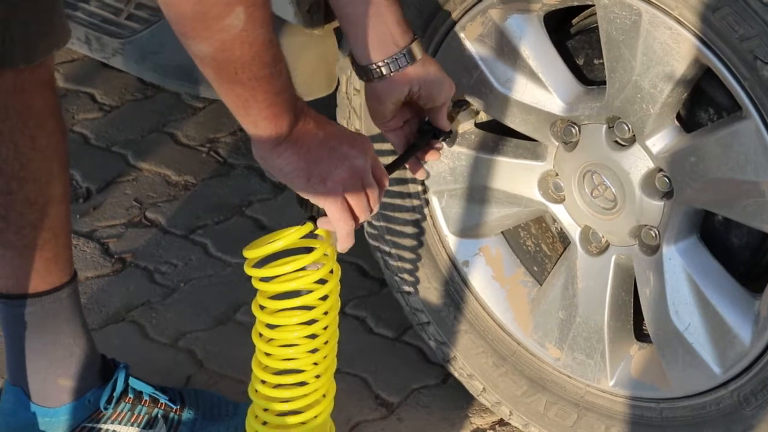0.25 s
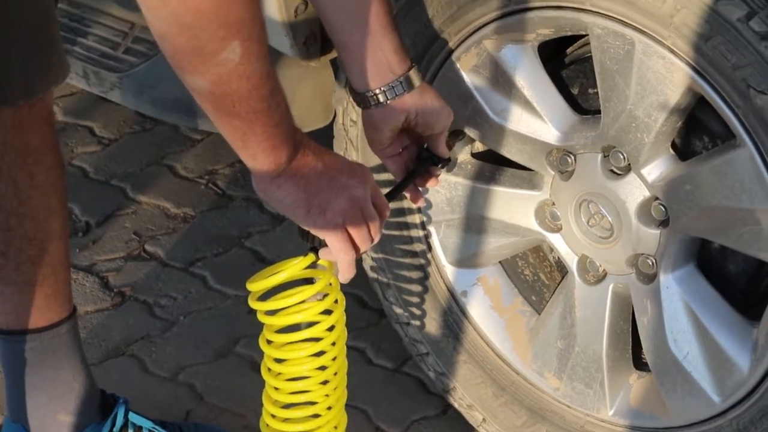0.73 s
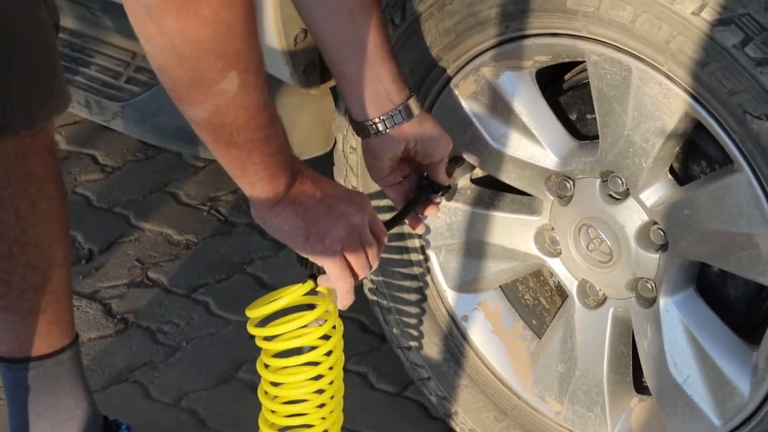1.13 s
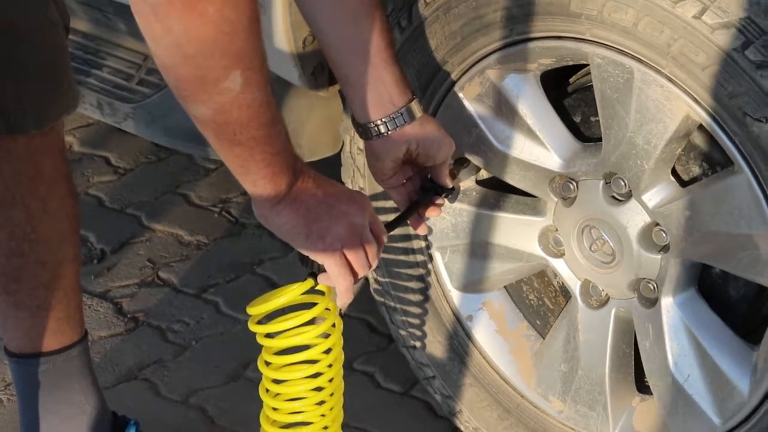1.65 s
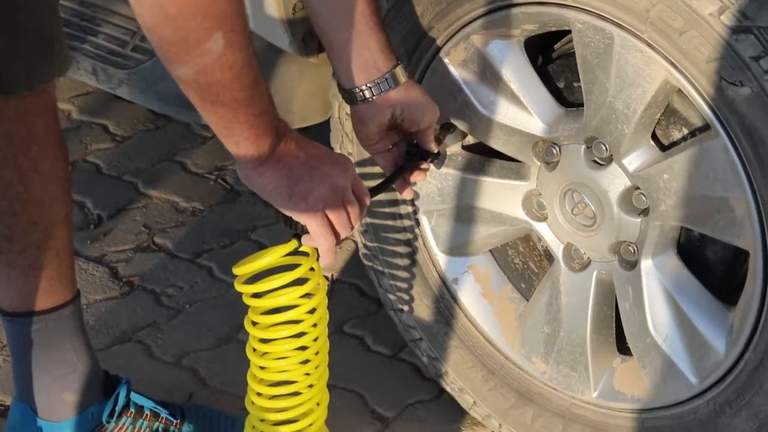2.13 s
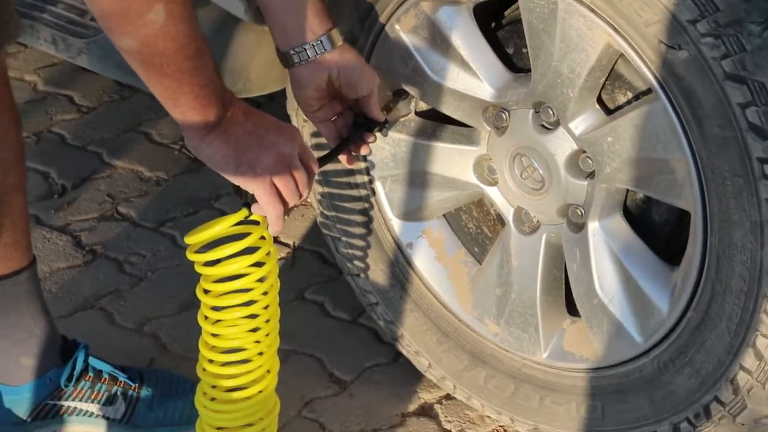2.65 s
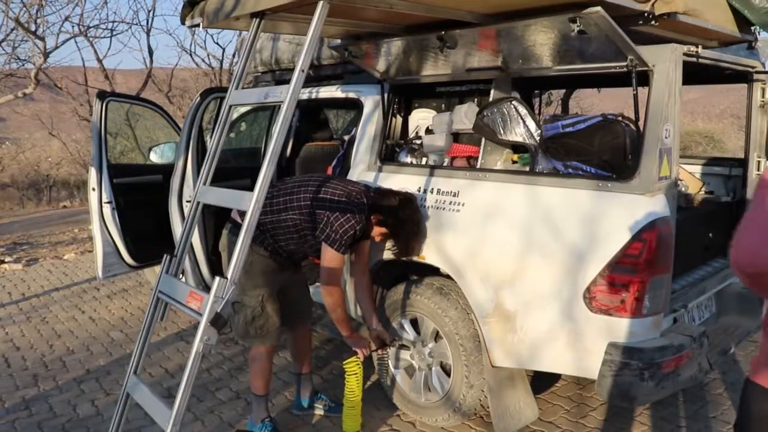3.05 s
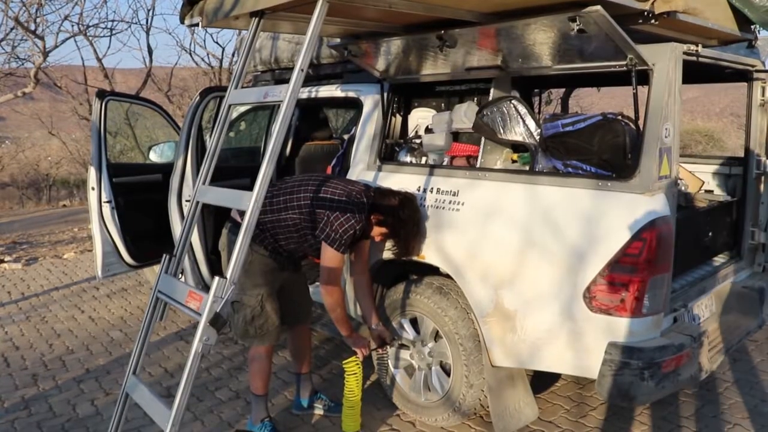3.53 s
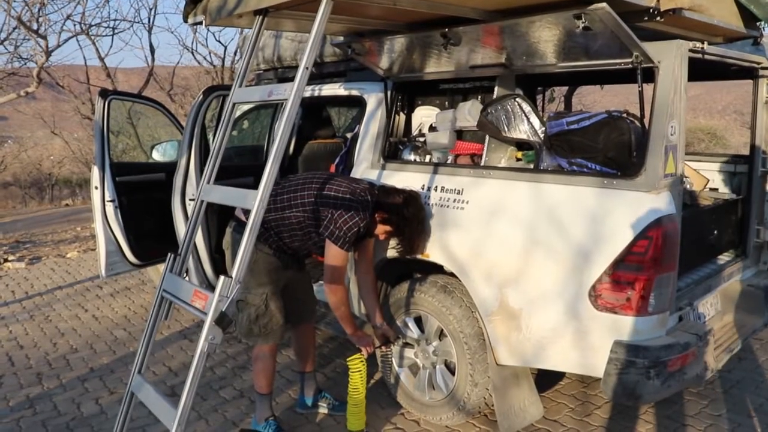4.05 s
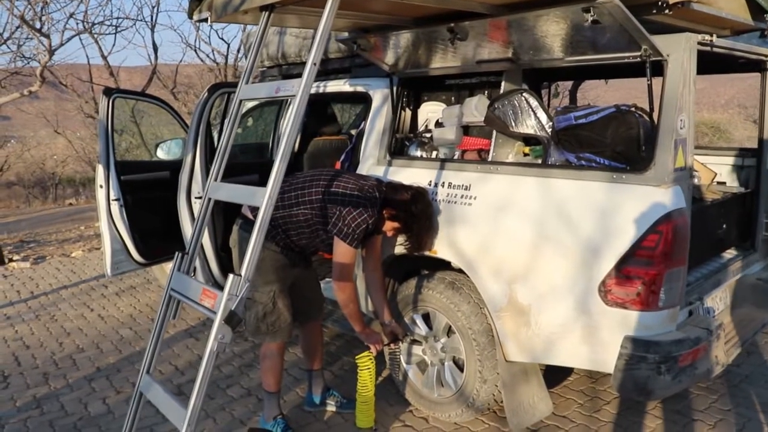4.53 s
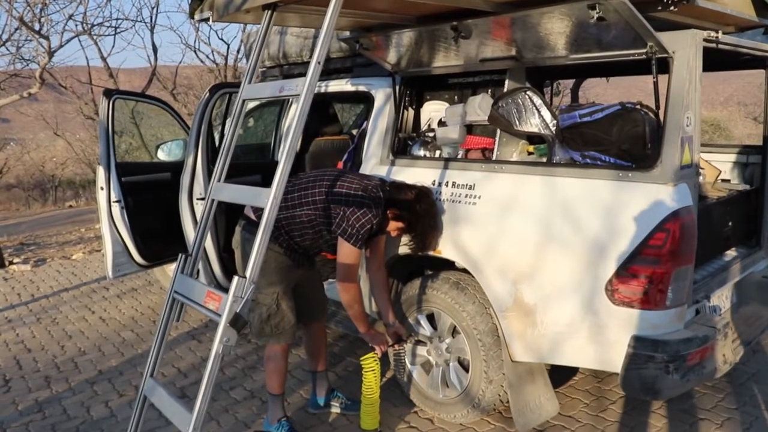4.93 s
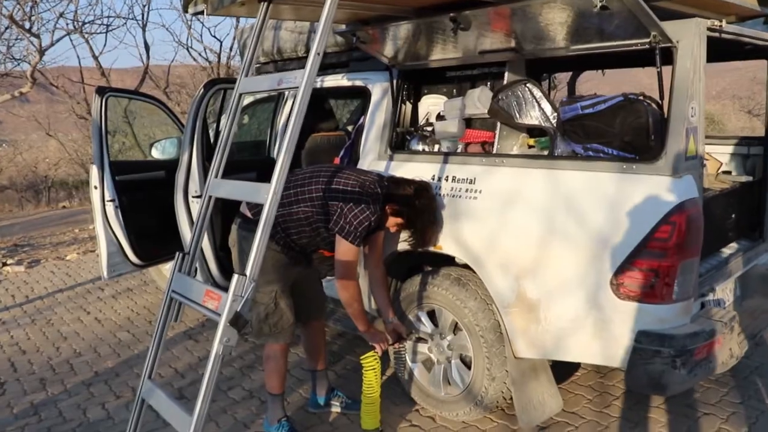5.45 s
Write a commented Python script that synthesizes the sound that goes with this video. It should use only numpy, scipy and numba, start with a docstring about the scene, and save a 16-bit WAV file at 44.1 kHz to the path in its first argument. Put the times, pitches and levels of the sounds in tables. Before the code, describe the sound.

Two long, loud hisses of compressed air from a tyre valve, with handling knocks between them and a metallic rattle at the end, outdoors.

```python
"""Two hissing bursts of air are heard outdoors, with knocks, scuffs and a metallic rattle over a low rumble.
Air is let out of a pickup tyre on paving through a hand-held gauge: the jet is noise coloured by the
gauge head, the hand and the wheel rim, differently for each grip. Knocks and scuffs are shaped noise;
the rattle adds wavering tones. One mono microphone signal, with gain control, fills both channels."""
import sys
import numpy as np
from scipy import signal
from scipy.fft import rfft, irfft, next_fast_len
from scipy.io import wavfile
from scipy.ndimage import uniform_filter1d
from numba import njit

SR = 44100
rng = np.random.default_rng(int(sys.argv[2]) if len(sys.argv) > 2 else 0)


def transcribe(u):
    """Save the signal u as a 16-bit wav file named by the first command-line argument.

    u: samples, shape (n,) or (channels, n), limited to [-1, 1]; the rate is SR.
    q: integer samples, one column per channel.
    """
    v = np.clip(np.atleast_2d(u).T, -1, 1)
    q = np.round(v * 32767).astype(np.int16)
    wavfile.write(sys.argv[1], SR, q)


N = 251060
SIZE = next_fast_len(N, True)  # a length that suits the Fourier transform
TIME = np.arange(N) / SR  # s
FREQ = np.maximum(np.fft.rfftfreq(SIZE, 1 / SR), 1)  # Hz

# the valve is pressed open twice:
# [opens t/s, attack t/s, closes t/s, base level/dB, extra body/dB, opening chuff/dB]
BURSTS = [(0.201, 0.036, 2.202, -16, -1.28, 6.5), (3.608, 0.024, 5.15, -17.5, 1.3, 3)]
# peaks and dips of the pocket between gauge, hand and rim, for each grip: [centre f/Hz, width f/Hz, level/dB]
FIRST_GRIP = [(640, 60, -4.4), (820, 70, -3.0), (1010, 280, 3.8), (1120, 90, -3.8), (1370, 70, 7.1),
              (1510, 40, -3.2), (2000, 220, -4.6), (2550, 310, -3.1), (2700, 80, 3.8), (3160, 80, -4.7),
              (3580, 60, -3.0), (4120, 70, -2.8), (4440, 300, 3.5), (4850, 190, -4.2), (5380, 280, -5.7),
              (5750, 150, 2.3), (6180, 130, -4.2), (6760, 590, 1.3), (7650, 300, 1.2), (10060, 180, 2.4),
              (11390, 560, -2.1), (12580, 300, 3.3), (13430, 400, -3.2), (14020, 250, -2.4)]
SECOND_GRIP = [(820, 70, -5.9), (1050, 40, -3.8), (1150, 640, 7.3), (1370, 60, -5.4), (1540, 80, -7.0),
               (1870, 70, -6.0), (1900, 240, 5.6), (2400, 70, 3.4), (2490, 50, -4.0), (2830, 80, -3.5),
               (3720, 80, -6.8), (4090, 540, 3.6), (4280, 70, 4.3), (4500, 90, -4.5), (5440, 50, 4.8),
               (6440, 190, -4.2), (7490, 270, -6.4), (7890, 590, 1.7), (8580, 160, -4.6), (9170, 230, 5.3),
               (10520, 670, -2.2), (11030, 80, 2.6), (12040, 420, -3.1), (15280, 290, -5.2)]


def undb(db):
    """Turn decibels into a gain."""
    return 10 ** (np.asarray(db) / 20)


def unit(x):
    """Scale a signal to rms 1."""
    return x / np.sqrt(np.mean(x ** 2))


def colour(points):
    """Draw a gain curve over frequency through (f/Hz, level/dB) points."""
    hz, db = np.transpose(points)
    return undb(np.interp(np.log(FREQ), np.log(hz), db))


def below(hz, order=8):
    """Gain of a smooth low-pass; a higher order is steeper."""
    return 1 / np.sqrt(1 + (FREQ / hz) ** (2 * order))


def band(low_hz, high_hz, order=2):
    """Gain of a smooth band-pass."""
    return below(high_hz, order) * np.sqrt(1 - below(low_hz, order) ** 2)


def resonance(hz, width):
    """Gain of one resonance, 1 at its centre."""
    return 1 / np.sqrt(1 + ((FREQ ** 2 - hz ** 2) / (FREQ * width)) ** 2)


def noise(gain):
    """Noise of rms 1, coloured by a gain at every frequency."""
    spectrum = rfft(rng.standard_normal(SIZE)) * gain
    return unit(irfft(spectrum, SIZE)[:N])


def walk(rate_hz):
    """Random wander of spread 1, mostly slower than the rate."""
    return noise(below(rate_hz, order=2))


def blow(start, t60, rise=0.00055):
    """Envelope of a hit: a quick rise, then a fall by 60 dB in t60 seconds."""
    age = np.maximum(TIME - start, 0)
    return (1 - np.exp(-age / rise)) * np.exp(-np.log(1000) * age / t60)


def swell(s, half, flat=1):
    """Bell-shaped envelope around a moment; a higher flat gives a level top and steeper sides."""
    return np.exp(-.5 * np.abs((TIME - s) / half) ** (2 * flat))


def reflections(share, longest, count=24):
    """The direct sound plus early echoes from wheel, body and paving: a fine comb over frequency."""
    response = np.zeros(SIZE)
    lags = rng.uniform(longest / 10, longest, count)  # s
    response[(lags * SR).astype(int)] = rng.standard_normal(count) * np.exp(-2 * lags / longest)
    response *= share / np.linalg.norm(response)
    response[0] = 1  # the direct path
    return rfft(response)


def outdoors(rumble_db=3, air_db=-56, gust_db=1.5, lowest_hz=55, split_hz=700):
    """A low rumble that swells and sinks, under a smooth faint hiss."""
    # slow course of the rumble, before rumble_db is added: [t/s, level/dB]
    rumble_course = [(0.0, -51.5), (.5, -59.5), (1.9, -56.5), (2.55, -53.5), (2.95, -59), (3.45, -52.5),
                     (4.6, -52), (5.3, -50.5), (5.69, -50)]
    # colour of the background: [f/Hz, relative level/dB]
    outdoor_colour = [(15, -50), (30, -20.5), (120, -3), (260, -5), (410, -13.5), (640, -14), (735, -14),
                      (810, -11.5), (970, -16.5), (1410, -19), (1850, -19.5), (3170, -25), (3530, -20.5),
                      (3930, -26.5), (12200, -31), (15500, -47)]
    shape = colour(outdoor_colour)
    course_db = np.interp(TIME, *np.transpose(rumble_course))
    level_db = course_db + rumble_db + gust_db * walk(5.8)
    rumble = undb(level_db) * noise(shape * band(lowest_hz, split_hz))
    return rumble + undb(air_db) * noise(shape * band(split_hz, SR))


def scuffs(grain_db=2.5):
    """Rubbing swells and fades, grainy with tiny slips, along with a few creaking resonances."""
    # soft scuffs and creaks: [peak t/s, half length t/s, rubbing level/dB, creak level/dB]
    scuff_moments = [(2.958, 0.059, -53.5, -64), (3.183, 0.076, -50.5, -61), (3.424, 0.031, -48, -43),
                     (3.484, 0.0065, -48.5, -61), (3.527, 0.011, -64, -53), (5.322, 0.017, -48.5, -64),
                     (5.424, 0.018, -48.5, -65)]
    # colour of the rubbing: [f/Hz, relative level/dB]
    rub_colour = [(59, -34), (100, -1.5), (330, -8.5), (558, -8), (1140, -17), (1630, -10.5), (1730, -13),
                  (2320, -15.5), (2520, -14.5), (9460, -38), (15000, -43)]
    # resonances that creak: [centre f/Hz, width f/Hz, relative level/dB]
    creak_modes = [(178, 37, 1), (328, 15, 2), (894, 39, -5), (1165, 39, -3), (1544, 20, -2),
                   (1960, 32, -9), (2320, 36, -6), (3380, 39, -16), (6380, 37, -17), (9290, 34, -17)]
    smooth_rub = noise(colour(rub_colour) * band(90, 15000))
    creak_power = sum((undb(db) * resonance(hz, width)) ** 2 for hz, width, db in creak_modes)
    creak = noise(np.sqrt(creak_power))
    rub = unit(smooth_rub * undb(grain_db * walk(300)))
    out = 0
    for s, half, rub_db, creak_db in scuff_moments:
        out = out + swell(s, half) * (undb(rub_db) * rub + undb(creak_db) * creak)
    return out


def knocks():
    """Each handling knock is a dull thump, a clack of its own pitch and a bright tick, dying together."""
    # knocks: [t/s, thump level/dB, clack level/dB, clack centre f/Hz, tick level/dB, fall by 60 dB t/s]
    knock_moments = [(2.063, -39, -74, 1500, -80, 0.44), (2.75, -60, -60, 4500, -41, 0.019),
                     (2.802, -46, -43, 1500, -51, 0.06), (2.853, -39, -51, 700, -70, 0.17),
                     (2.994, -43, -36, 348, -52, 0.047), (2.996, -50, -32, 960, -56, 0.041),
                     (2.995, -52, -38, 2700, -62, 0.11), (3.34, -53, -27, 2950, -48, 0.01),
                     (4.195, -41, -70, 1500, -80, 0.22), (5.306, -50, -40, 990, -57, .05),
                     (5.359, -60, -56, 4500, -45, 0.023), (5.408, -51, -44, 800, -57, .06)]
    thump = noise(band(96, 260, order=3))
    tick = noise(band(5000, 10500, order=3))
    out = 0
    for s, thump_db, clack_db, clack_hz, tick_db, t60 in knock_moments:
        clack = noise(resonance(clack_hz, clack_hz) ** 2)
        hit = undb(thump_db) * thump + undb(clack_db) * clack + undb(tick_db) * tick
        out = out + hit * blow(s, t60, rise=0.0019)
    return out


def rattle(scatter_db=-2.5, chatter_db=1.7, phase_wander=0.66, clink_db=-3, clink_t60=0.024):
    """A loose metal part clatters and clinks at every contact; its modes ring on, wavering as it keeps touching."""
    # contacts: [t/s, base ring level/dB, clatter level/dB, clatter fall by 60 dB t/s]
    contacts = [(5.486, -45, -37.5, 0.18), (5.569, -35, -42, .05), (5.612, -36, -42.5, 0.2),
                (5.623, -40, -47, 0.16), (5.650, -41, -45, 0.13), (5.662, -41, -47, 0.19)]
    # ringing modes of the metal: [f/Hz, relative level/dB, fall by 60 dB t/s]
    metal_modes = [(1710, -17, 0.41), (2510, -14, 0.31), (3500, 0.5, 0.13), (3420, -16, 0.22),
                   (4500, -19, 0.23), (5850, -17, 0.21), (6100, -17, 0.22), (6960, -18, .08),
                   (7420, -20, .08), (7900, -23, .08), (9040, -19, 0.14), (10660, -30, .08)]
    # colour of the clatter: [f/Hz, relative level/dB]
    clatter_colour = [(1100, -24), (1500, 6.5), (2100, 1), (2900, -3), (4000, -14), (7500, -14.5),
                      (14000, -31)]
    clatter = noise(colour(clatter_colour))
    out = sum(undb(clatter_db) * blow(s, t60) * clatter for s, _, clatter_db, t60 in contacts)
    for hz, db, decay in metal_modes:
        # each contact excites this mode by a different amount
        sizes_db = scatter_db * rng.standard_normal(len(contacts))
        energy = 0
        for (s, ring_db, _, _), size_db in zip(contacts, sizes_db):
            ring_and_clink = blow(s, decay) + undb(clink_db) * blow(s, clink_t60)
            energy = energy + (undb(ring_db + size_db) * ring_and_clink) ** 2
        level = np.sqrt(energy) * undb(db + chatter_db * walk(90))
        phase = 2 * np.pi * hz * TIME + phase_wander * walk(90)  # radians
        out = out + level * np.sin(phase)
    return out


def leak(uneven_db=1.2):
    """Air slips faintly past the seal before the first burst, and seeps on for a moment after each one."""
    # seep after the valve shuts: [centre f/Hz, width f/Hz, base level/dB]
    seep_bands = [(7400, 1300, -60), (2970, 1600, -59.5), (11000, 7000, -65)]
    seep_s, after_levels_db = 0.5, (0.5, -4.5)  # fading time; change of level after each burst
    first_opens, first_attack = BURSTS[0][:2]
    before = TIME < first_opens + first_attack
    seating = undb(-56) * noise(band(2500, 13000)) * before  # the gauge is being pushed on
    seep = sum(undb(db) * noise(resonance(hz, width) ** 2) for hz, width, db in seep_bands)
    after = 0
    for (_, _, closes, *_), db in zip(BURSTS, after_levels_db):
        after = after + undb(db) * (TIME > closes) * swell(closes, seep_s, flat=1.2)
    return seating + seep * after * undb(uneven_db * walk(15))


def whistles():
    """Air squeezing through the gap at the seal sings in narrow bands of noise that come and go."""
    # narrow hisses: [peak t/s, half length t/s, level/dB, centre f/Hz, width f/Hz]
    whistle_moments = [(0.323, 0.029, -18.5, 7070, 800), (0.372, 0.09, -23, 9950, 400),
                       (0.644, 0.12, -25, 12700, 700), (1.927, 0.2, -24.5, 6650, 600),
                       (3.73, 0.058, -27, 12740, 700), (3.74, 0.073, -24, 9000, 900),
                       (4.023, 0.064, -22, 9100, 350)]
    out = 0
    for s, half, db, hz, width in whistle_moments:
        out = out + undb(db) * swell(s, half, flat=2.2) * noise(resonance(hz, width) ** 2)
    return out


def jet(burst, grip, flutter_db=0.2, spit_db=0.3, wander_db=0.3):
    """Jet noise rings the pocket around the valve, opens with a chuff and changes tone as the gauge seats."""
    # colour of the free jet: [f/Hz, relative level/dB]
    jet_colour = [(200, -47), (500, -24.5), (750, -19), (1000, -17), (2000, -13.5), (3000, -9),
                  (3800, -1.5), (5200, -6.5), (6500, -2), (9500, -3), (13000, -4.5), (15800, -9.5)]
    # throaty, middle, hissing and sizzling parts: [upper edge f/Hz, relative level/dB,
    # share of the extra body [factor], share of the chuff [factor], change while not yet seated/dB]
    jet_parts = [(2670, -17.5, 1, 1.55, -3), (5570, -5.5, 0.7, 1.35, -6.5), (10530, 0, 0.03, -0.16, -1),
                 (15900, -3.5, 0, -0.57, 1.5)]
    # the hand presses harder or eases off: [t/s, half length t/s, change of flow level/dB]
    presses = [(1.0, 0.051, 1.3), (3.99, 0.031, 1.5), (4.323, 0.054, -1.8), (4.468, .05, 1.5)]
    chuff_s, settle_s = 0.031, 0.48  # the chuff dies quickly; the gauge seats slowly
    shut_db_per_s = 820  # fall of the jet as the valve pin springs back

    opens, attack, closes, level_db, body_db, chuff_db = burst
    pocket_db = sum(db * 2 ** -(2 * (FREQ - hz) / width) ** 2 for hz, width, db in grip)
    shape = colour(jet_colour) * undb(pocket_db)
    # the hand creeps during the burst, so one pattern of echoes gives way to another
    early = shape * reflections(share=0.39, longest=.018)
    late = shape * reflections(share=0.39, longest=.018)
    creep = np.interp(TIME, [opens, closes], [0, np.pi / 2])

    age = np.maximum(TIME - opens, 0)
    chuff = np.exp(-np.maximum(age - attack, 0) / chuff_s)
    unseated = np.exp(-age / settle_s)
    air, low = 0, 1
    for high, part_db, body_share, chuff_share, unseated_db in jet_parts:
        part = band(low, high, order=12)
        low = high  # the next part starts where this one ends
        db = part_db + body_share * body_db + chuff_share * chuff_db * chuff
        db = db + unseated_db * unseated + wander_db * walk(20)
        blend = np.cos(creep) * noise(early * part) + np.sin(creep) * noise(late * part)
        air = air + undb(db) * blend

    # eddies shake the whole jet; the valve pin lets more through when the hand presses harder
    eddies = undb(flutter_db * walk(60) + spit_db * walk(690))
    press_db = sum(db * swell(s, half) for s, half, db in presses)
    shut_db = shut_db_per_s * np.maximum(TIME - closes, 0)
    valve = np.minimum(age / attack, 1) ** 2 * undb(press_db - shut_db)
    return undb(level_db) * air * eddies * valve


@njit
def follow(x, attack, release):
    """Follow a signal, rising and falling with time constants in seconds."""
    out, e = np.empty(len(x)), 0.
    for i in range(len(x)):
        e += (x[i] - e) / (SR * (attack if x[i] > e else release))
        out[i] = e
    return out


def scene():
    """Both bursts and the small sounds around them, the same in both channels."""
    background = outdoors()
    handling = scuffs() + knocks() + rattle()
    seal = leak() + whistles()
    air = jet(BURSTS[0], FIRST_GRIP) + jet(BURSTS[1], SECOND_GRIP)
    mono = background + handling + seal + air
    return np.array([mono, mono])


def record(dry, hiss_db=-65):
    """Gain control turns loud sound down a moment late; a faint even hiss is added and the top cut steeply."""
    threshold_db, slope = -25.5, 0.4  # where the cut starts; dB of cut per dB above that
    attack_s, release_s = .07, 0.06
    top_hz = 15850
    level_db = 10 * np.log10(uniform_filter1d(dry[0] ** 2, size=256) + 1e-12)
    wanted_cut_db = slope * np.maximum(level_db - threshold_db, 0)
    cut_db = follow(wanted_cut_db, attack_s, release_s)
    heard = dry * undb(-cut_db) + undb(hiss_db) * rng.standard_normal(N)
    steep_low_pass = signal.ellip(12, .1, 85, top_hz, fs=SR, output="sos")
    return signal.sosfilt(steep_low_pass, heard)


dry = scene()
out = record(dry)
transcribe(out)
```